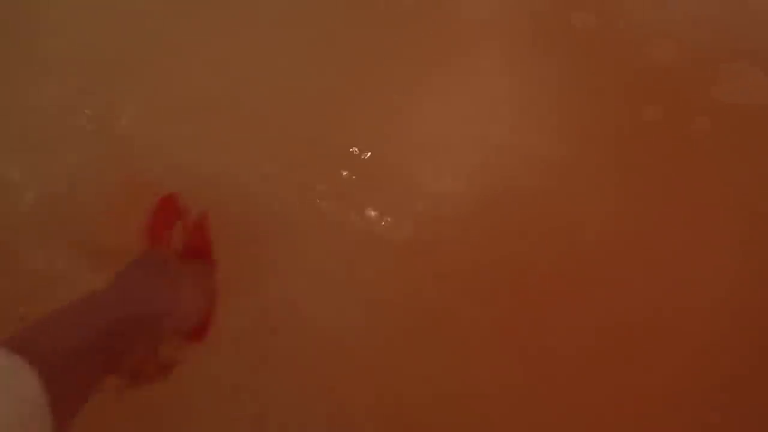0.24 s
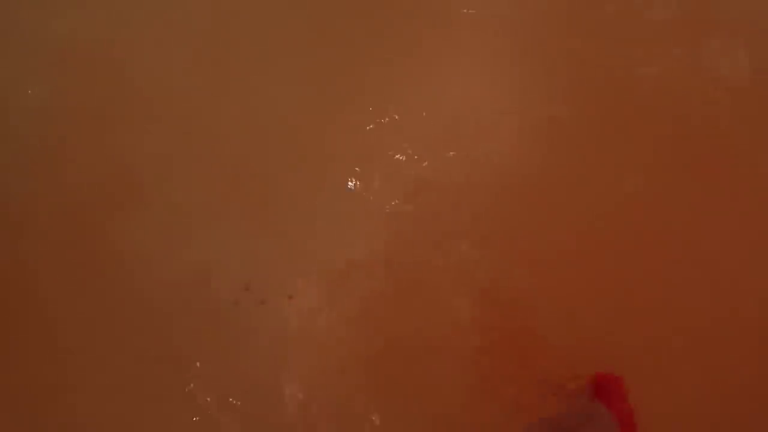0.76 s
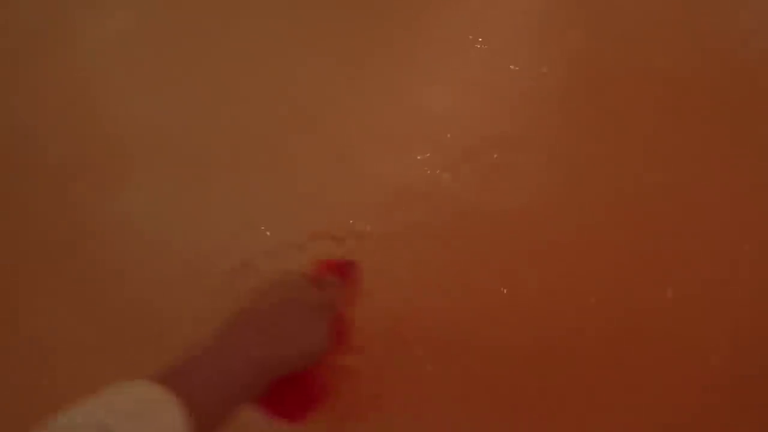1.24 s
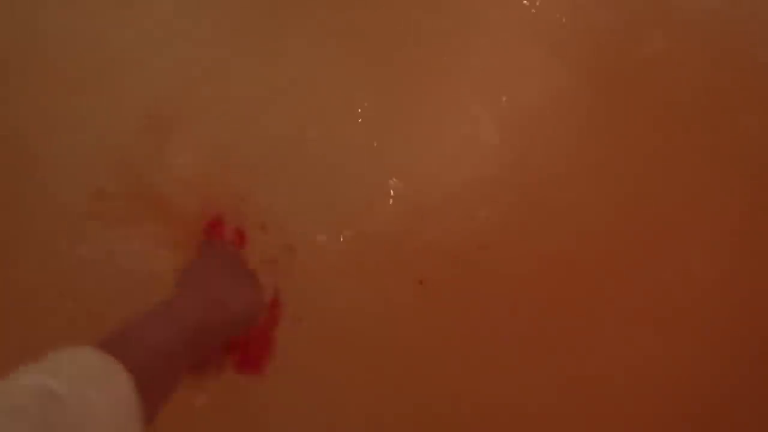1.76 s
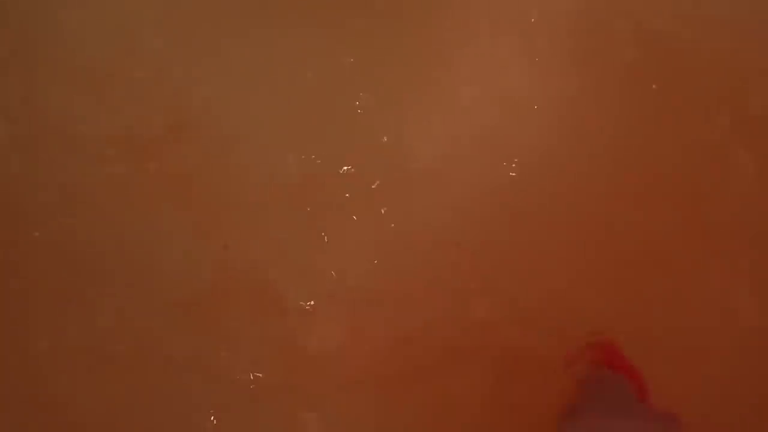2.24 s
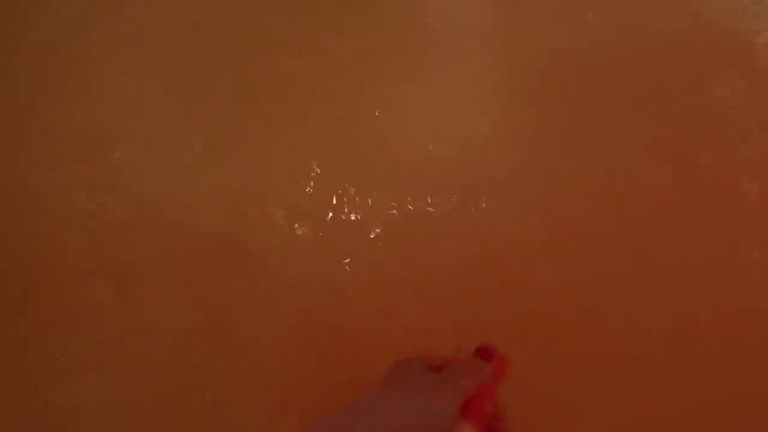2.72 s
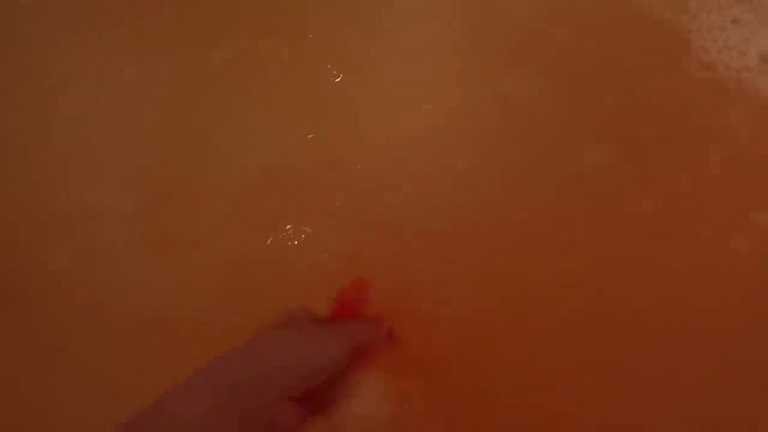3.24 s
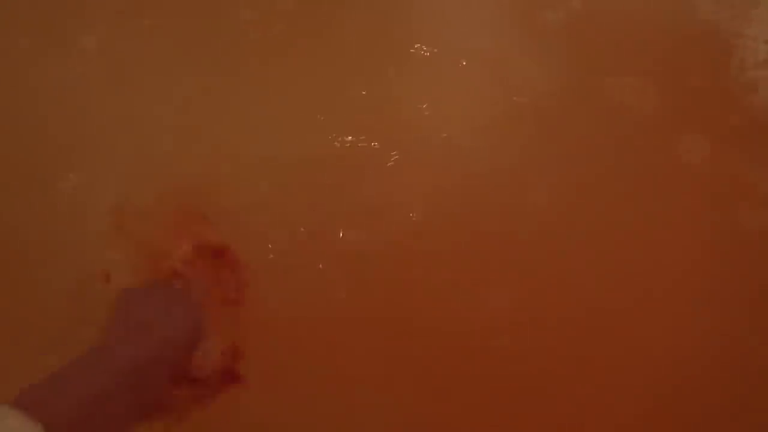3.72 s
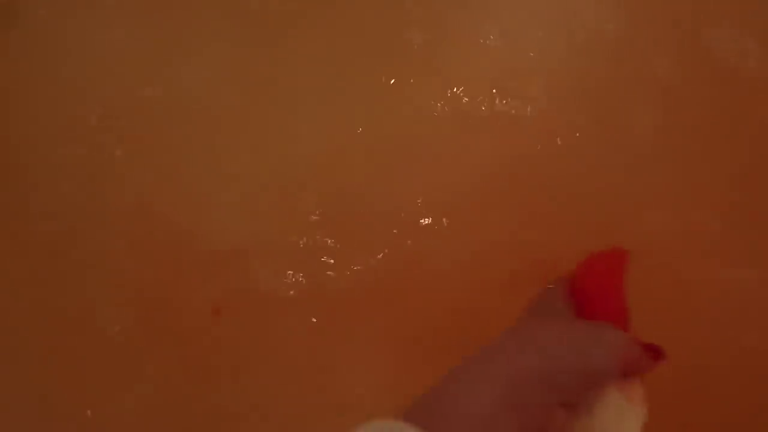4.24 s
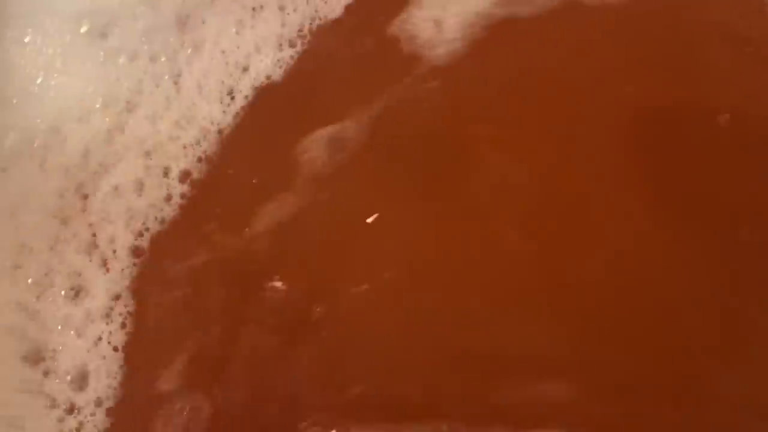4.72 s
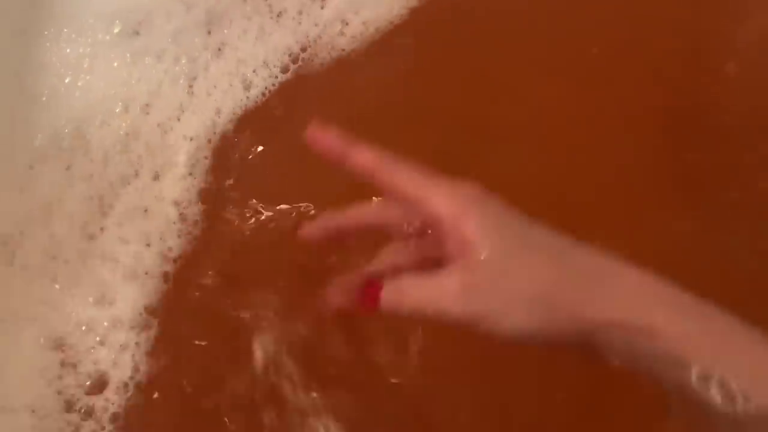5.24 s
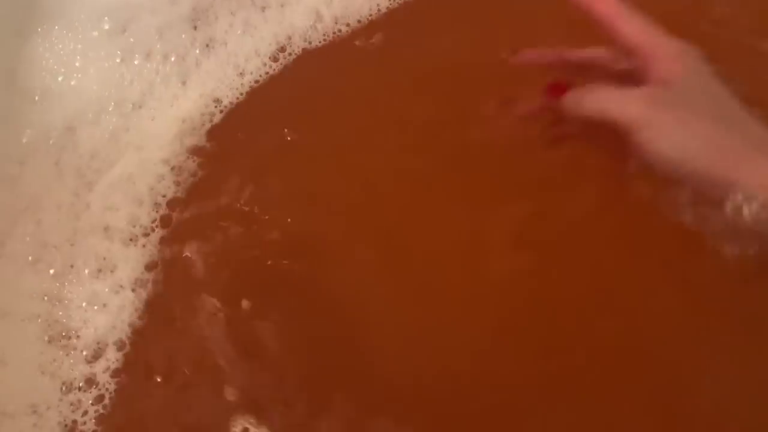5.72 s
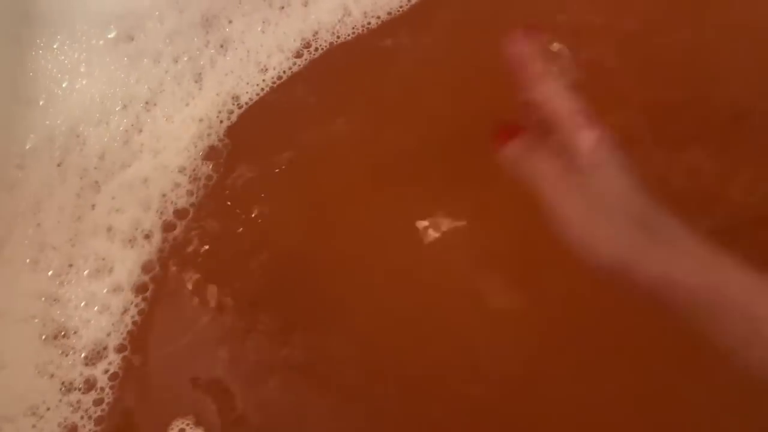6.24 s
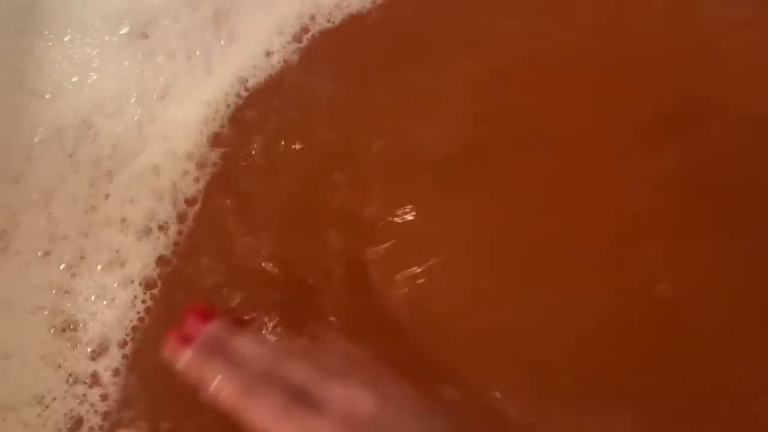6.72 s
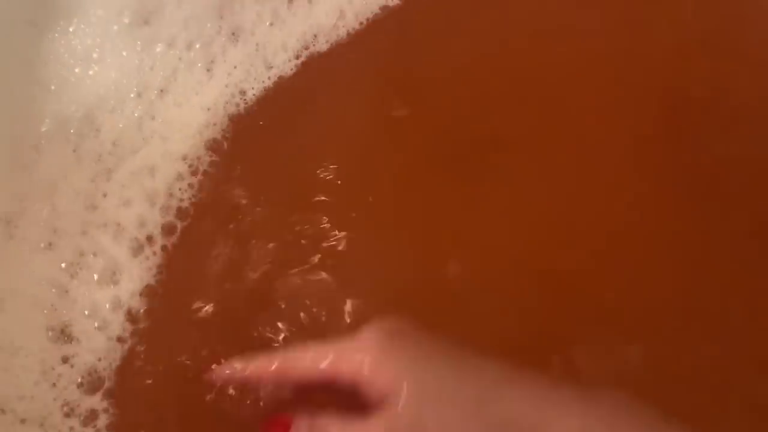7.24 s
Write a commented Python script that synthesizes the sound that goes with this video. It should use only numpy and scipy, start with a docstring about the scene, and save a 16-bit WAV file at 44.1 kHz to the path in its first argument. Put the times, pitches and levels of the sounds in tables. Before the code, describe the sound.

From the start, a hand swishes through a full bathtub in a small tiled room. Irregular sloshes carry gurgling bubbles of all sizes and light spatter, over a soft wash of water and a low house rumble. The sloshing swells from about 0.5 to 1 second and is loudest around 1.4 to 1.6 seconds. Gentler swirls and lapping follow, with small surges near 2.2 and 2.6 seconds and a fuller slosh around 3.8 to 4.1 seconds. At about 4.5 seconds the sound cuts abruptly to a much quieter stretch, with faint hiss and a barely audible low drone that comes and goes. A few single drips fall near 5 seconds. One small splash with ringing plinks comes around 6.3 seconds, then sparse drips until about 7.3 seconds. The sound is in stereo, with the water near the center and a short room echo.

```python
"""A hand swishes through a full bathtub in a small tiled room, over a low house rumble.
Each slosh traps air that rings as bubbles of all sizes. At 4.55 s a hard cut starts a calmer,
quieter scene: single drips and, near 6.3 s, one small splash beside the foam, over a faint drone.
A two-port microphone hears both scenes."""
import sys
import numpy as np
from scipy import signal
from scipy.fft import rfft, irfft, next_fast_len
from scipy.io import wavfile
from scipy.ndimage import uniform_filter1d

SR = 44100
rng = np.random.default_rng(int(sys.argv[2]) if len(sys.argv) > 2 else 0)


def generate_wav(signal):
    """Clip the signal to [-1, 1] and save it as 16-bit WAV at the path in sys.argv[1]."""
    frames = np.transpose(np.atleast_2d(signal))
    scaled = np.clip(frames, -1, 1) * 32767
    pcm = np.round(scaled).astype(np.int16)
    wavfile.write(sys.argv[1], SR, pcm)


N = 329868
CUT_S = 4.553  # part 0 before, part 1 after


def amp(db):
    """Gain from dB."""
    return 10 ** (np.asarray(db) / 20)


def unit_rms(x):
    """Scale to rms 1."""
    return x / np.sqrt(np.mean(x ** 2) + 1e-20)


def curve_at(points, hz):
    """Interpolate (hz, value) points over log frequency."""
    f, value = np.transpose(points)
    return np.interp(np.log(hz + 1), np.log(f + 1), value)


def filtered(x, gain):
    """Filter by gain(hz)."""
    size = next_fast_len(x.shape[-1] + 4096)
    return irfft(rfft(x, size) * gain(np.fft.rfftfreq(size, 1 / SR)), size)[..., :x.shape[-1]]


def wander(width):
    """Noise smoothed twice over width samples, rms 1."""
    return unit_rms(uniform_filter1d(uniform_filter1d(rng.standard_normal(N), width), width))


def mode_noise(noise, hz, width_hz):
    """Noise ringing in one mode, rms 1."""
    return unit_rms(filtered(noise, lambda f: 1 / (1 + (2 * (f - hz) / width_hz) ** 2)))


def steady_background(part):
    """A wash of water and hiss before the cut, faint room hiss after, over low rumble; mid and side."""
    # wash spectrum per part: freq_hz, relative_db
    spectra = [
        [(12, -40.5), (20, -14), (91, -11), (123, -0.5), (193, -10.5), (390, -10.5), (600, -20), (1500, -11),
         (4000, -22.5), (8000, -36.5), (11000, -41.5), (16000, -76)],
        [(12, -36), (20, -9.5), (77, 3), (248, -14.5), (399, -28), (873, -36), (1060, -31), (3740, -33),
         (5230, -35), (8180, -27), (11100, -34.5), (12400, -42), (16000, -45)],
    ]
    # per part: rms_db
    wash_db = [-51, -72.5]
    # room modes excited by the house rumble: freq_hz, width_hz, part0_db, part1_db
    rumble_modes = [(60.2, 14, -58, -70), (99.6, 8.1, -56.5, -74)]
    noise = rng.standard_normal((2, 2, N))
    wash = amp(wash_db[part]) * unit_rms(filtered(noise[0], lambda f: amp(curve_at(spectra[part], f))))
    rumble = sum(amp(db[part]) * mode_noise(noise[1], hz, width_hz) for hz, width_hz, *db in rumble_modes)
    return wash + rumble


def drone():
    """Two faint, fuzzy low tones that come and go."""
    # envelopes: time_s, lower_db, upper_db
    envelopes = [(4.601, -106, -110), (4.879, -101, -105), (4.981, -77, -84), (5.33, -82, -82),
                 (5.7, -86, -94), (5.85, -91, -105), (6.149, -84.5, -105), (6.8, -101, -110),
                 (6.85, -80.5, -110), (7.05, -77.5, -105), (7.48, -90, -105)]
    # tones: freq_hz, width_hz
    tones = [(254, 63), (460, 52)]
    time_s, *levels_db = np.transpose(envelopes)
    noise, t = rng.standard_normal(N), np.arange(N) / SR
    return sum(mode_noise(noise, *tone) * amp(np.interp(t, time_s, db))
               for tone, db in zip(tones, levels_db))


def tile_tails(build_s=0.00081, walls_db=-3.5, walls_s=0.0078):
    """Mid and side tails of sparse reflections; each band decays at its own rate."""
    # room decay: freq_hz, t60_s
    decay = [(300, 0.48), (1000, 0.39), (2800, 0.3), (7500, 0.3), (15000, 0.11)]
    # tail colour from steam and towels: freq_hz, gain_db
    tone = [(500, 0.5), (2000, 3), (5000, 1), (10000, 1.5)]
    taps = np.zeros((2, SR // 2))
    at = np.arange(60, SR // 2 - 20, 20) + rng.integers(0, 20, (2, (SR // 2 - 61) // 20))
    np.put_along_axis(taps, at, rng.choice([-1., 1.], at.shape), 1)
    hz, frame_s, bands = signal.stft(taps, SR, nperseg=128)
    bands = bands * amp(curve_at(tone, hz)[:, None] - 60 * frame_s / curve_at(decay, hz)[:, None])
    tail = signal.istft(bands, SR, nperseg=128)[1]
    t = np.arange(tail.shape[1]) / SR
    tail *= 1 - np.exp(-t / build_s)  # build-up over the first wall trips
    tail *= 1 + amp(walls_db) * np.exp(-t / walls_s)  # tub walls crowd the first reflections
    return tail / np.linalg.norm(tail, axis=1)[:, None]


def reverb(water, turn_s=.11, count=3):
    """Tiled-room reverberation, crossfaded between several random tails so that no single pitch rings."""
    phase = np.pi * np.arange(N) / SR / (count * turn_s)
    windows = [np.sqrt(2 / count) * np.cos(phase + np.pi * k / count) for k in range(count)]
    return sum(signal.fftconvolve((water * w)[None], tile_tails(), axes=1)[:, :N] for w in windows)


def tub_gain(hz):
    """Direct sound plus the tub ringing along with the water."""
    # tub modes: freq_hz, width_hz, gain_db
    modes = [(470, 60, -4), (625.6, 50, -6.5)]
    return 1 + sum(amp(db) / (1 + 2j * (hz - mode_hz) / width_hz) for mode_hz, width_hz, db in modes)


def microphone(water, background, part):
    """Water, tiled room and background at two spaced ports; returns left, right."""
    # water colour per part: freq_hz, gain_db
    colour = [
        [(6000, -2), (10000, -4), (13000, -2), (16000, -18)],
        [(8000, -5), (11000, -7), (13600, -7.5), (16000, 8)],
    ]
    # per part: gain_db
    reverb_db = [-2, -6]
    # side kept by the centred water, relative to the diffuse background: freq_hz, gain_db
    centred = [(250, -22), (1000, -14), (4000, 1)]
    # port difference per part: freq_hz, side_gain_db
    ports = [
        [(60, -27.5), (110, -21), (200, -2), (380, -0.5), (700, -0.5), (1290, -5.5), (2380, -5.5), (4400, -5),
         (8120, 1.5), (15000, 13)],
        [(60, -56), (110, -4.5), (200, -4.5), (380, -4), (700, 18.5), (1290, 7.5), (2380, 2.5), (4400, 7),
         (8120, -7), (15000, 10)],
    ]
    # water sits slightly right; per part: share_of_mid_in_side
    lean = [-0.011, -0.079]
    water = filtered(water, lambda f: tub_gain(f) * amp(curve_at(colour[part], f)))
    direct = water * amp([[0], [-3.5]])  # mid, side
    mid, side = direct + amp(reverb_db[part]) * reverb(water)
    side = filtered(side, lambda f: amp(curve_at(centred, f))) + background[1]
    # the delay between ports puts their difference a quarter cycle off their sum
    side = filtered(side, lambda f: 1j * amp(curve_at(ports[part], f))) + lean[part] * mid
    return mid + background[0] + np.array([side, -side])


def bubble(hz, t60_s, climb, onset_cycles=3.0, opening_s=0.00028):
    """Damped sine; with climb > 0 the pitch rises as the bubble nears the surface, then levels off."""
    t = np.arange(int(t60_s * SR) + 32) / SR
    pitch_hz = hz * (1 + 2 * climb * np.tanh(2 * t / t60_s))
    attack = 1 - np.exp(-(t / (onset_cycles / hz + opening_s)) ** 2)
    return np.sin(2 * np.pi * np.cumsum(pitch_hz) / SR) * amp(-60 * t / t60_s) * attack


def slosh_gains(rise_s=0.019, step=64):
    """Gains of large bubbles, medium bubbles and spray: sloshes rise, hold and settle over the lapping."""
    # sloshes pushed up by the hand: start_s, hold_s, large_db, medium_db, spray_db
    sloshes = [(-.06, 0.0078, -42.5, -34, -46), (0.442, 0.28, -43, -43.5, -49),
               (0.564, 0.26, -37, -36, -45), (0.65, 0.028, -49.5, -41, -42),
               (0.827, 0.046, -33.5, -41.5, -48.5), (0.982, 0.13, -51.5, -39, -47.5),
               (1.183, 0.25, -43.5, -35, -41), (1.37, 0.11, -29, -32, -37),
               (1.504, 0.084, -31.5, -33.5, -39.5), (1.546, 0.018, -31, -37.5, -41.5),
               (1.756, 0.16, -89, -49, -51.5), (2, 0.22, -69, -51.5, -59),
               (2.198, 0.025, -54.5, -39.5, -40), (2.215, 0.26, -53, -43, -53.5),
               (2.432, 0.045, -46.5, -44.5, -47.5), (2.523, 0.023, -41, -39.5, -55.5),
               (2.55, 0.016, -71, -49.5, -53), (2.816, 0.12, -50.5, -44, -51.5),
               (2.922, 0.11, -65.5, -61, -57), (3.147, 0.017, -52, -70, -79),
               (3.226, 0.13, -61, -50.5, -54.5), (3.515, 0.0077, -51, -45, -48.5),
               (3.71, 0.36, -60.5, -69, -51.5), (3.811, 0.019, -66, -54, -40),
               (3.856, 0.058, -33.5, -38.5, -50), (4.009, 0.14, -37.5, -40.5, -51),
               (4.374, 0.15, -52.5, -52.5, -51.5), (4.872, 0.13, -90, -74, -63), (5.0, 0.24, -78, -78, -72),
               (5.561, 0.02, -85, -88, -83), (6.22, 0.061, -91, -63, -55), (6.275, 0.08, -72, -48, -47.5),
               (6.476, 0.027, -96, -82, -62), (6.9, 0.016, -84, -84, -78),
               (7.209, 0.026, -65.5, -67.5, -71)]
    # settling: large_db_per_s, medium_db_per_s, spray_db_per_s
    settle_db_per_s = [112, 106.5, 125.5]
    # lapping per part: large_db, medium_db, spray_db
    lapping_db = [
        [-67, -54.5, -59],
        [-86.5, -85, -104],
    ]
    t = np.arange(0, N + step, step) / SR
    power = amp(np.transpose(lapping_db)[:, (t >= CUT_S).astype(int)]) ** 2
    for start_s, hold_s, *levels_db in sloshes:
        age_s = t - start_s
        settled_db = np.outer(settle_db_per_s, np.maximum(age_s - rise_s - hold_s, 0))
        same_part = (t < CUT_S) == (start_s < CUT_S)
        rise = np.clip(age_s / rise_s, 0, 1) * same_part
        power += (rise * amp(np.array(levels_db)[:, None] - settled_db)) ** 2
    return [np.interp(np.arange(N) / SR, t, np.sqrt(row)) for row in power]


def churn(burst_s=.025, pitches=28, patchy_db=1.45):
    """Swarms of random bubbles, most small and a few large, following the hand in shared bursts."""
    # swarms: low_hz, high_hz, rate_per_s, t60_cycles, spread_db, tilt_db_per_octave, mean_climb, burst_db
    swarms = [(381.2, 960, 150, 21.7, -0.5, 11.5, 0.12, -5), (950, 2923, 800, 22, 4, 2.5, 0.13, 2),
              (2881, 7000, 850, 27, 1, -2.5, 0.029, 5), (6000, 18000, 3100, 6.8, 2.5, 3.5, 0.11, 4.5),
              (3200, 11000, 240, 9, 3, -2, 0.039, 5)]
    # per swarm: slosh_column (0 large, 1 medium, 2 spray), offset_db
    drives = [(0, -4), (1, -2.5), (2, -6), (2, -13.5), (2, -8)]
    # countless tiny bursts blended under each swarm: relative_db
    crowds_db = [-3, -5.5, -3.5, -6.5, -6]
    gains, width = slosh_gains(), int(burst_s * SR)
    bursts, crackle = wander(width), wander(width // 5)
    out = np.zeros(N)
    for row, (column, offset_db), crowd_db in zip(swarms, drives, crowds_db):
        low_hz, high_hz, rate_per_s, t60_cycles, spread_db, tilt_db, mean_climb, burst_db = row
        size_draw, birth_draw, pitch_draw = rng.random((3, N))
        patches = wander(2 * width)  # each swarm also thickens and thins on its own
        size_db = spread_db * np.minimum(-np.log(size_draw + 1e-9), 4) + burst_db * bursts
        births = unit_rms(amp(size_db) * (birth_draw < rate_per_s / SR))
        crowd = amp(crowd_db + burst_db * (0.384 * bursts + crackle)) * rng.standard_normal(N)
        swarm = np.zeros(N)
        for k in range(pitches):
            hz = low_hz * (high_hz / low_hz) ** ((k + rng.random()) / pitches)
            ring = bubble(hz, t60_cycles * rng.uniform(0.41, 2.0) / hz, 2 * mean_climb * rng.random())
            kicks = (births + crowd) * ((pitch_draw * pitches).astype(int) == k)
            swarm += amp(tilt_db * np.log2(hz / low_hz)) * signal.oaconvolve(kicks, ring)[:N]
        out += unit_rms(swarm) * gains[round(column)] * amp(offset_db + patchy_db * patches)
    return out


def spatter(hz, noise, t60_s=0.0086, fizz_db=-14, fizz_t60_s=0.042):
    """Droplets thrown up as a bubble forms: a gritty puff from its pitch upward that fizzes out."""
    edges_hz = np.clip([0.97 * hz, 1.4 * hz], 100, .45 * SR) * [.95, 1]
    grit = signal.lfilter(*signal.butter(2, edges_hz, "bandpass", fs=SR), noise ** 3)
    t = np.arange(len(noise)) / SR
    decay = amp(-60 * t / t60_s) + amp(fizz_db - 60 * t / fizz_t60_s)
    attack = np.minimum(t / 0.0011, 1)
    return unit_rms(grit) * decay * attack * amp(-17.5 + 3.5 * np.log2(hz / 1000))


def loud_bubbles(pitch_spread=.2, scatter_s=.016, lead_s=.0015, weaker_db=12.5, fragments=4):
    """Bubbles and drips that stand out, each with spatter and weaker fragments breaking off."""
    # bubbles: start_s, level_db, pitch_hz, t60_s, climb (half the full glide, as a share of pitch)
    bubbles = [(.004,-31.5,1530,0.016,-0.057),(.008,-32,2275,0.024,0.073),(.012,-28.5,810,0.012,0.051),(.043,-32,2330,0.0073,-0.11),(0.062,-32,1480,0.036,0.11),(0.0727,-52,1640,0.026,-0.08),(0.131,-33,1460,0.027,-0.08),(0.136,-36.5,1020,0.14,-0.063),
               (.16,-44,6500,.004,0.1),(.17,-28.5,3100,0.0027,-0.04),(.207,-35,4760,0.0077,-0.044),(.208,-30.5,970,0.013,0.083),(.209,-27.5,1640,0.012,0.044),(.211,-27.5,2080,0.019,-0.014),(.221,-30,2930,0.013,0.0024),(0.2784,-31.5,2250,0.0082,-0.049),(.32,-50,10600,.004,.02),(0.343,-42,1220,0.017,0.092),(.3955,-43,6400,.005,0.055),(.4244,-42,6510,.004,0.06),(.4246,-44.5,9200,0.0044,0.039),(.4653,-41,9350,.004,.02),
               (.414,-27.5,3070,0.0089,-0.036),
               (0.444,-20.5,2375,0.04,-0.11),(.4605,-43.5,500,0.17,0.31),(.4809,-28,2140,0.014,0.11),(0.507,-29.5,490,0.013,-0.0092),(.505,-32,6000,0.0023,-0.085),(0.5257,-29,1710,0.078,0.23),
               (.5313,-32,806,0.18,0.036),(.5756,-40.5,5540,.004,0.18),(0.5809,-27.5,524,0.061,-0.00063),(0.6294,-30,836,0.072,-0.07),(0.6509,-24.5,1610,0.012,-0.02),(.6524,-37,7060,.003,0.22),(0.6774,-20.5,1990,0.028,0.16),
               (0.6934,-13.5,5350,0.0019,-0.014),(0.695,-25,3270,.004,0.031),(.668,-22,2620,0.0086,-0.008),(0.726,-25.5,3600,0.0095,0.057),(0.7287,-25,1086,0.04,-0.048),(.7372,-28,1040,0.013,0.097),(0.7867,-17.5,4200,0.0025,-0.098),(0.806,-28.5,1746,0.075,-0.089),
               (.885,-32.5,485,0.086,.05),(0.873,-23.5,2900,0.0052,0.0026),(.918,-17.5,950,0.0086,-0.15),(.9258,-19,705,0.022,0.071),(0.9357,-19.5,957,0.027,0.098),(.985,-21,1643,0.027,0.16),(.872,-36.5,5030,0.0037,-0.1),(1.0316,-42,6870,0.0028,0.16),(1.0964,-40,7400,.003,.02),(1.034,-37,3860,0.005,-0.094),(1.098,-34.5,5300,0.0027,-0.007),(1.126,-34.5,4500,0.0044,-0.062),(1.089,-29,1630,0.015,0.023),
               (1.107,-27,1070,0.095,0.0038),(1.1605,-26,1150,0.044,-0.031),(1.2068,-26,4750,0.0068,-0.0084),(1.212,-21,2940,0.0067,-0.091),(1.265,-34.5,5450,.004,-0.034),(1.281,-23.5,1843,0.046,-0.14),
               (1.314,-19,1594,0.018,-0.01),(1.3238,-26.5,1065,0.012,-0.03),(1.343,-23,3520,0.0057,-0.074),(1.343,-20.5,1090,0.015,0.041),(1.3514,-26,572,0.082,0.18),
               (1.391,-21,3740,0.0048,0.047),(1.3951,-18,2770,0.0054,0.011),(1.4318,-8,990,0.0051,-0.12),(1.433,-5.5,1550,0.0094,0.056),(1.443,-17,2195,0.025,0.089),
               (1.446,-21.5,649,0.039,-0.024),(1.465,-27,498,0.067,0.34),(1.496,-29.5,9650,0.0013,0.059),(1.511,-31,6000,0.0033,-0.024),(1.514,-30.5,5160,.004,0.017),(1.533,-37,7500,0.0022,-0.0028),(1.512,-25.5,2790,0.0059,-0.1),(1.5634,-24.5,3720,0.0061,0.0013),(1.584,-24,993,0.034,-0.054),
               (1.588,-28,470,0.073,0.042),(1.596,-7.5,1810,0.025,-0.16),(1.678,-21.5,1690,0.028,0.017),(1.693,-26,1820,0.014,.02),(1.727,-31.5,1147,0.04,0.036),(1.695,-41.5,482,0.15,-0.037),(1.752,-43,6940,0.0091,-0.018),(1.758,-44,6000,0.0078,0.028),(1.7789,-39.5,5230,.004,.02),(1.7908,-29,4010,0.0092,-0.004),
               (1.84,-29.5,2080,0.0063,-0.00097),(1.8602,-43.5,5460,.004,0.049),(1.8732,-37.5,6300,0.0033,0.024),(1.872,-30,2180,0.01,0.063),(1.905,-37.5,4020,.008,-0.066),(1.9557,-33.5,1866,0.023,-0.2),(2.0293,-47,7400,.003,0.084),(2.0337,-32.5,1560,0.012,-0.058),(2.0488,-45.5,576,0.35,-0.051),
               (2.101,-41,3860,.006,0.12),(2.1,-49,7190,.003,-0.0057),(2.117,-40,883,0.054,0.098),(2.146,-31,1980,0.014,0.058),(2.116,-29,1300,0.053,0.06),(2.218,-35,3500,0.0037,0.22),(2.219,-36,6500,0.0022,.02),(2.2222,-27.5,1050,0.072,-0.0091),(2.231,-26.5,3840,0.0029,-0.018),(2.2384,-25,2060,0.0087,-0.076),(2.2531,-25,1175,0.015,-0.18),
               (2.2663,-29,966,0.023,0.091),(2.279,-27,1640,0.01,-0.099),(2.36,-39.5,727,0.051,0.26),(2.3815,-26,1062,0.1,-0.047),(2.4284,-29.5,1980,0.0085,0.0025),(2.4766,-29.5,1760,0.0045,-0.037),
               (2.491,-37,7800,.005,0.08),(2.588,-31,4200,0.0032,-0.19),(2.59,-37.5,7000,.002,-0.089),(2.529,-29.5,1600,0.0089,-0.033),(2.5352,-34,550,0.041,0.06),(2.5407,-33,718,0.12,0.2),(2.5597,-19,670,0.042,0.31),(2.5587,-17.5,1428,0.024,0.042),
               (2.621,-26.5,764,0.033,0.44),(2.634,-37,1223,0.067,0.16),(2.6593,-32,1885,0.03,0.12),(2.662,-36.5,704,0.012,-0.087),(2.6912,-30.5,2880,0.0037,0.093),
               (2.75,-45.5,600,0.078,0.018),(2.7894,-32,947,0.074,0.24),(2.84,-36,3300,0.011,-0.04),(2.875,-48,8300,0.0046,-0.09),(2.885,-39,2800,.02,-0.12),(2.842,-42,2000,0.014,-0.078),(2.8905,-37.5,1095,0.056,0.036),(2.9346,-37,3470,.007,-0.018),
               (2.9353,-42.5,727,0.081,-0.047),(2.936,-41,1930,.012,0.083),(2.951,-41,8500,0.0015,-0.055),(2.955,-38,4000,0.0045,-0.31),(2.9613,-36.5,1505,0.049,-0.14),(2.98,-35.5,2930,.02,0.018),(3.0343,-37,3500,0.012,-0.091),(3.036,-42,7660,0.0026,0.083),(3.065,-48,3600,.004,.02),(3.065,-37,6700,0.0014,-0.055),(3.089,-41,7600,.004,.02),(3.133,-43,6600,0.0028,-0.15),(3.071,-41.5,870,0.07,-0.12),
               (3.163,-38.5,4400,0.0054,0.047),(3.1686,-30,1480,0.022,-0.061),(3.253,-24.5,1560,0.0017,-0.04),(3.2516,-29.5,8300,0.00066,-0.11),(3.251,-28.5,4800,0.0016,-0.11),(3.2511,-26,751,0.03,-0.054),
               (3.328,-35,2670,0.013,-0.1),(3.3546,-35.5,1694,0.024,-0.091),(3.394,-39.5,4400,0.0049,-0.033),(3.4266,-37.5,4770,0.0056,-0.052),(3.4581,-42.5,800,0.093,-0.028),
               (3.46,-35,1590,0.0091,0.037),(3.4925,-38.5,4330,0.0096,0.0062),(3.535,-36,3230,0.0097,0.46),(3.5354,-31,1546,0.025,-0.055),(3.537,-34,2700,0.013,-0.036),
               (3.537,-36,11600,0.0015,-0.15),(3.5614,-30.5,1634,0.017,-0.04),(3.6152,-48,7520,.003,-0.049),(3.68,-45,6310,.003,.02),(3.657,-44.5,772,0.05,-0.017),(3.71,-35,5190,0.053,-0.17),(3.751,-28,4380,0.01,-0.064),
               (3.8225,-30.5,4200,0.0069,-0.16),(3.833,-34.5,3000,0.013,0.023),(3.848,-26.5,2720,.015,-0.084),(3.8416,-26,1700,0.019,0.1),(3.8534,-27.5,1810,0.036,0.37),(3.861,-36,6350,0.0071,-0.035),(3.86,-37.5,9000,.004,.02),(3.8575,-27,531,0.02,-0.0081),(3.902,-33,4330,0.0075,-0.03),
               (3.9043,-25,1780,0.0092,0.068),(3.92,-26.5,1390,0.043,-0.12),(3.9373,-24.5,285,0.031,-0.037),(3.98,-37,3350,0.026,0.32),(3.939,-27,524,0.022,0.24),(3.956,-21.5,662,0.0056,-0.053),
               (4.0434,-23.5,3200,0.0051,0.027),(4.044,-29,426,0.1,0.19),(4.051,-31,5240,.008,-0.085),(4.049,-27,1440,.02,0.029),(4.056,-19.5,1617,0.027,0.12),(4.0727,-32.5,658,0.047,0.18),(4.0889,-24.5,950,0.036,0.18),
               (4.11,-30,1047,0.048,0.013),(4.123,-40,5140,.004,-0.12),(4.125,-53,6800,0.0047,.02),(4.1311,-29.5,1940,0.022,0.025),(4.1318,-27.5,2650,0.0085,0.065),(4.173,-27.5,2490,0.014,-0.11),(4.205,-32.5,1505,0.047,0.027),(4.2835,-26.5,3220,0.0036,-0.0023),(4.306,-37.5,1450,.02,-0.083),(4.311,-44,5500,.003,.02),
               (4.385,-48,7000,0.0032,-0.014),(4.5247,-30.5,483,0.019,0.48),(4.5353,-27,450,0.0068,0.00032),(4.6204,-50,5830,0.0022,0.018),(4.849,-64,4700,0.0073,-0.055),(4.916,-59,11200,.002,.02),(4.8663,-50,7770,0.0022,-0.066),(4.863,-53,1636,0.015,0.16),(4.9015,-44,1780,0.0071,-0.13),(4.923,-49,3200,.008,0.16),(4.8875,-31.5,1850,0.013,0.12),
               (4.901,-43,2750,0.019,0.0055),(4.9278,-44.5,7400,0.0017,0.002),(4.9276,-25,1786,0.0086,0.041),(4.955,-48,2060,0.038,0.055),(4.976,-41.5,8300,0.0026,-0.12),
               (4.993,-43,10430,0.0019,.02),(4.9944,-35,3400,0.0022,0.017),(4.9936,-44,5200,0.0017,0.062),(5.01,-47,3040,0.018,-0.026),(5.046,-63,8500,.0015,.02),(5.063,-54,9600,0.0017,-0.0016),(5.0837,-45.5,8660,0.0017,-0.11),(5.0832,-48.5,2650,0.015,-0.11),(5.2657,-46.5,7380,0.0029,-0.025),(5.3453,-52.5,2450,0.025,0.097),
               (5.5785,-40.5,6170,0.0014,-0.02),(5.722,-62,1410,.012,-0.047),(6.09,-50,1230,0.03,-0.03),(6.155,-56,5440,0.0024,-0.14),(6.1943,-38,8030,0.0025,-0.092),
               (6.2244,-44,13400,0.0016,0.085),(6.232,-36,2240,0.02,-0.16),(6.2445,-38,7900,0.0022,.02),(6.2443,-40.5,2360,0.014,0.033),(6.2571,-27.5,6400,0.00086,-0.044),
               (6.263,-42,3100,0.014,-0.054),(6.279,-29,7700,0.0016,0.027),(6.2794,-37,2070,0.014,-0.011),(6.294,-36,3300,0.012,-0.064),(6.2965,-42.5,999,0.12,-0.0076),(6.298,-34,10650,.002,-0.11),
               (6.316,-29.5,1365,0.057,-0.033),(6.3344,-31.5,12400,0.0017,-0.22),(6.3346,-37,1048,0.1,-0.017),(6.359,-37.5,1144,0.14,-0.00047),(6.372,-47,2570,.015,-0.029),(6.388,-41,3820,0.011,0.0095),(6.407,-43,2400,0.014,0.031),(6.42,-49,5020,0.1,.01),(6.46,-51,5080,0.11,-0.093),(6.2565,-41,10200,.0015,-0.035),(6.335,-31,6850,.002,-0.042),(6.333,-41,14900,0.0022,-0.12),(6.402,-43.5,14300,.002,-0.066),(6.4013,-26,8560,0.0016,0.025),
               (6.4025,-31,5050,0.014,-0.072),(6.4836,-34,6950,0.0019,-0.051),(6.494,-40.5,1740,.019,-0.096),(6.497,-51,3520,0.052,-.02),(6.5037,-27.5,6780,0.00096,-0.073),(6.515,-45,11840,0.0017,0.12),
               (6.5639,-45,2110,0.0083,-0.066),(6.578,-53,9580,0.0023,-0.054),(6.7027,-55,2390,0.031,0.073),(6.7783,-50.5,7130,0.0031,-0.074),(6.9101,-48.5,5580,0.004,0.041),(6.9103,-50,9480,0.0016,.02),
               (6.924,-35,10000,0.0015,-0.053),(6.9242,-51.5,4390,0.0065,-0.14),(7.0712,-54.5,7140,0.0021,-0.022),(7.1833,-48,11920,0.0024,-0.17),(7.203,-59,1800,.02,-0.0063),(7.22,-56,4500,0.0065,.02),(7.238,-54.5,9020,.0015,-0.018),(7.2084,-49,5010,0.0035,0.031),(7.2369,-34,1254,0.012,-0.067),
               (7.237,-50.5,2020,0.0084,0.19),(7.239,-42.5,1710,0.018,-0.16)]
    out = np.zeros(N + SR)
    draws = rng.uniform(-1, 1, (len(bubbles), fragments + 1, 3))
    for (start_s, db, hz, t60_s, climb), draw in zip(bubbles, draws):
        draw[0, :2] = 0  # main bubble: on pitch, on time
        out[round(start_s * SR):][:2048] += amp(db) * spatter(hz, rng.standard_normal(2048))
        for k, (detune, lag, sign) in enumerate(draw):
            ring = bubble(hz * (1 + pitch_spread * detune), t60_s * (.6 if k else 1) + 0.00012, climb)
            ring *= np.sign(sign) * amp(db - weaker_db * np.sqrt(k)) / abs(ring).max()
            onset_s = start_s + scatter_s * abs(lag) - lead_s * (k > 0)
            out[max(round(onset_s * SR), 0):][:len(ring)] += ring
    return out[:N]


def scene():
    """Swishing, then drips; the hard cut ends the first scene's reverberation."""
    water = loud_bubbles() + churn()
    after_cut = np.arange(N) >= CUT_S * SR
    swishing = microphone(water * ~after_cut, steady_background(part=0), part=0)
    dripping = microphone(water * after_cut, steady_background(part=1) + drone(), part=1)
    return np.where(after_cut, dripping, swishing)


def record(dry):
    """Low-pass at 16.3 kHz."""
    lowpass = signal.firwin(511, 16300, window=("kaiser", 9), fs=SR)
    return signal.oaconvolve(dry, lowpass[None], "same")


dry = scene()
out = record(dry)
generate_wav(out)
```